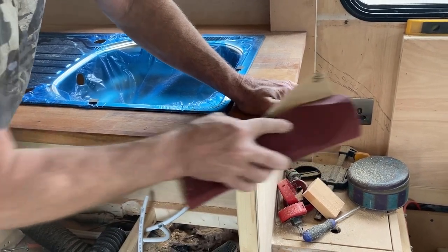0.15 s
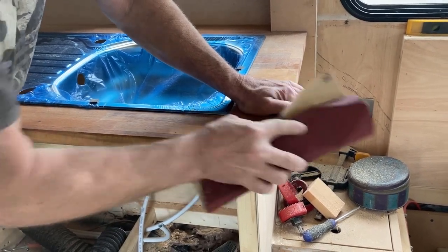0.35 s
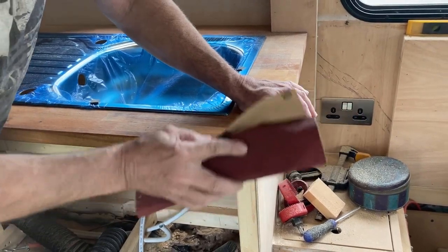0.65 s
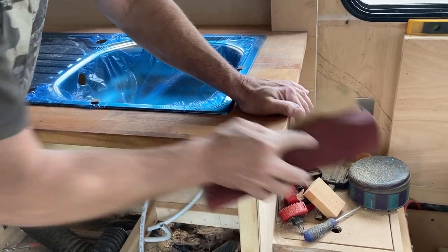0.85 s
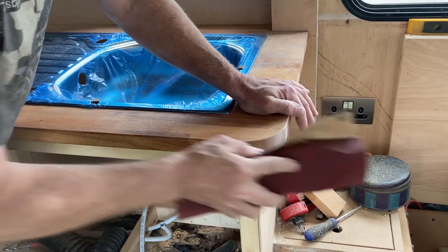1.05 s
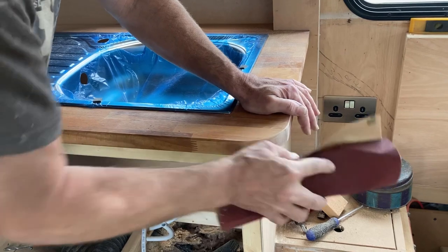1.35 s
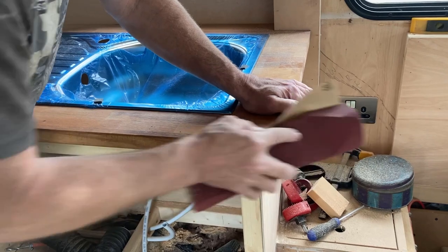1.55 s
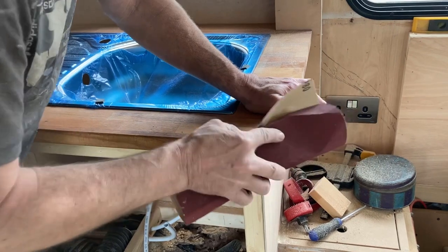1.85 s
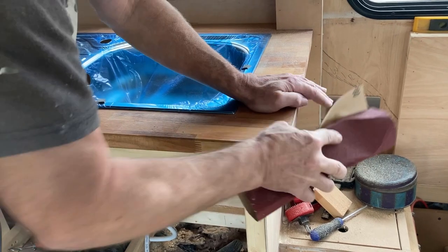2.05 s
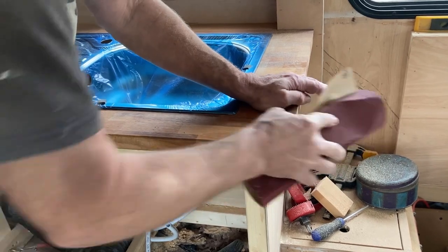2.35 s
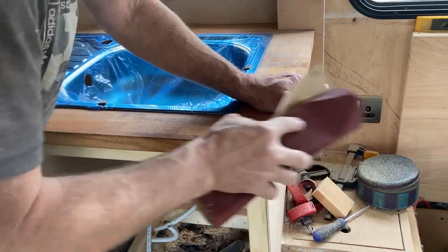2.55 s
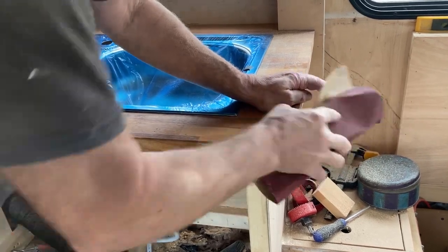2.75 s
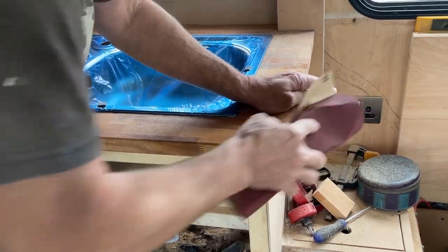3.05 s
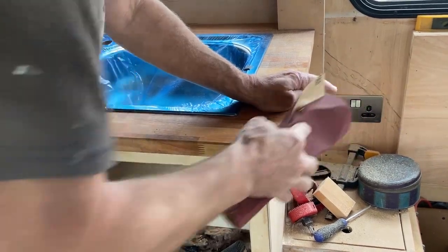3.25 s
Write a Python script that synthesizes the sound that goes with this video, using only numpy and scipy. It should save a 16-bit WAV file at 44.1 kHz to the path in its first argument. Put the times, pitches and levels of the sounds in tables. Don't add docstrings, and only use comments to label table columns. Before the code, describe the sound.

Sandpaper round a block rasps back and forth on a wooden worktop edge, pauses, then makes separate strokes, each starting with a woody knock and swelling in hiss; small panelled cabin, close stereo microphone.

```python
import sys
import numpy as np
from scipy import signal
from scipy.fft import rfft, irfft
from scipy.io import wavfile
from scipy.ndimage import uniform_filter1d

SR = 44100
rng = np.random.default_rng(int(sys.argv[2]) if len(sys.argv) > 2 else 0)


def volts_from_decibels(level):
    exponent = np.asarray(level, float) / 20
    return 10 ** exponent


def put_to_file(sound):
    columns = np.atleast_2d(sound).T
    safe = np.clip(columns, -1, 1)
    whole_steps = np.round(safe * 32767)
    wavfile.write(sys.argv[1], SR, whole_steps.astype(np.int16))


N = 149940
T = np.arange(N) / SR

# start_s, peak_db, favoured_pitch_hz, boom_db
KNOCKS = [
    (0.771, -20, 930, 9.5),
    (0.791, -31, 487, 11),
    (0.887, -22.5, 293, 10),
    (1.155, -33, 1030, -3),
    (1.513, -20.5, 560, 0.5),
    (1.87, -22.5, 444, -3),
    (2.217, -19.5, 810, 6),
    (2.626, -21, 410, 15),
    (2.648, -23.5, 293, 5),
    (2.973, -21.5, 460, 10.5),
]
# pitch_hz, level_db, t60_s (time to fade by 60 dB)
WORKTOP = [(155, -6, 0.04), (304, -3, 0.15), (380, 4, 0.015), (492, -4.5, 0.19), (650, 0, 0.02),
           (740, 4.5, 0.021), (885, -6.5, 0.097), (1020, 3.5, 0.011), (1159, -9, 0.091), (1326, -9, 0.094),
           (1760, -5, 0.021), (2480, -11, 0.041), (2666, 3, 0.0077), (3680, -21, 0.0067)]
# pitch_hz, level_db, t60_s
PANELS = [(38.6, -2, 0.68), (52.3, -4, 0.58), (74.8, -2, 0.14), (90, 1, 0.23), (112.2, -6, 0.29),
          (153.2, -5.5, 0.17), (200, -2.5, 0.11), (244, -30, 0.059), (293, -9, 0.15)]
# pitch_hz, level_db (per Hz)
GRIT = [(120, -19.5), (250, -11.5), (1000, -4.5), (1400, -4.5), (1700, -11.5), (2700, -7), (8000, -14),
        (12000, -18), (15500, -24.5)]


def rms_one(x):
    return x / np.sqrt(np.mean(x ** 2) + 1e-20)


def at_hz(points, hz):
    p = np.array(points)
    return np.interp(np.log(hz + 1), np.log(p[:, 0] + 1), p[:, 1])


def colour(x, points):
    gain = volts_from_decibels(at_hz(points, np.fft.rfftfreq(N, 1 / SR)))
    return irfft(rfft(x) * gain, N)


def band_noise(order, low_hz, high_hz):
    band = signal.butter(order, [low_hz, high_hz], "band", fs=SR, output="sos")
    return rms_one(signal.sosfilt(band, rng.standard_normal(N)))


def drift(rate_hz):
    r = np.exp(-2 * np.pi * rate_hz / SR)
    settle = 9000
    return rms_one(signal.lfilter([1], [1, -2 * r, r * r], rng.standard_normal(N + settle))[settle:])


def ring(clicks, hz, t60):
    r, w = volts_from_decibels(-60 / (t60 * SR)), 2 * np.pi * hz / SR
    return signal.lfilter([0, np.sin(w)], [1, -2 * r * np.cos(w), r * r], clicks + 1e-18)


def tail(x, t60):
    t = T[:SR // 2]
    echo = rng.standard_normal(len(t)) * volts_from_decibels(-60 * t / t60) * np.minimum(t / 0.0017, 1)
    return signal.fftconvolve(x, echo / np.linalg.norm(echo))[:N]


def quiet_cabin():
    # pitch_hz, level_db (per Hz)
    spectrum = [(15, -39), (25, 0), (52, 2.5), (141, -12.5), (1140, -30.5), (1400, -38), (3000, -40.5),
                (12000, -43.5), (15600, -82), (22000, -120)]
    return volts_from_decibels(-69) * rms_one(colour(rng.standard_normal(N), spectrum))


def echoes(x):
    low = signal.sosfilt(signal.butter(1, 2500, fs=SR, output="sos"), x)
    high = signal.lfilter(*signal.butter(1, 11000, fs=SR), x - low)
    return tail(low, 0.25) + tail(high, 0.23)


def springs():
    # start_s, level_db, favoured_pitch_hz, shove_length_s
    events = [(.05, -46.5, 55, 0.04), (0.298, -49, 90, 0.045), (0.425, -40.5, 200, 0.021),
              (.526, -57.5, 140, 0.0065), (0.9, -30, 155, 0.036), (0.86, -40.5, 90, 0.15),
              (.975, -40.5, 155, 0.027), (1.293, -40.5, 167.8, 0.018), (1.545, -42, 60, 0.039),
              (1.656, -35.5, 292, 0.038), (1.72, -44.5, 150, 0.019), (1.74, -47.5, 65, 0.016),
              (1.912, -37, 69.6, 0.046), (2.035, -35.5, 90, 0.044), (2.28, -39.5, 60, 0.055),
              (2.41, -41.5, 164, 0.042), (2.507, -48.5, 215, .008), (2.54, -52, 69.44, 0.038),
              (2.72, -41, 52, 0.039), (2.819, -48.5, 150, 0.044), (3.059, -40.5, 75.6, 0.041),
              (3.24, -41, 59.6, 0.025), (3.277, -41, 85.5, 0.015)]
    noise, shoves = rng.standard_normal(N), []
    soften = signal.butter(2, 500, fs=SR)
    for s, _, _, length in events:
        fade = (T > s) * np.exp(-np.abs(T - s) / length)
        shove = 0.81 * noise * fade / np.sqrt(length * SR)
        shove[int(s * SR)] += 0.7
        shoves.append(signal.lfilter(*soften, shove))
    out = np.zeros(N)
    for hz, _, t60 in PANELS:
        push = np.zeros(N)
        for shove, (_, db, near_hz, _) in zip(shoves, events):
            push += volts_from_decibels(db - 19 * np.log2(hz / near_hz) ** 2) * shove
        out += ring(push, hz, t60)
    return out


def grains():
    per_s, spread_db, flutter_db = 7000, 1.5, 2
    size = volts_from_decibels(spread_db * np.minimum(rng.exponential(1, N), 4)) * rng.choice([-1, 1], N)
    clicks = size * (rng.random(N) < per_s / SR)
    return rms_one(clicks) * volts_from_decibels(flutter_db * drift(32.5))


def brushing():
    # start_s, length_s, level_db
    brushes = [
        (0.726, 0.066, -69),
        (0.98, 0.16, -76.5),
        (1.094, 0.12, -76.5),
        (1.355, 0.092, -75.5),
        (1.766, 0.073, -79),
        (2.111, 0.18, -67.5),
        (2.466, 0.26, -70),
        (2.87, 0.15, -74.5),
    ]
    # start_s, level_db, decay_s
    ticks = [
        (1.107, -65.5, 0.0069),
        (.585, -84.5, 0.003),
        (2.506, -64, 0.0076),
        (2.545, -73, 0.0046),
        (1.46, -79, 0.011),
    ]
    # pitch_hz, width_hz, level_db
    sheet = [(940, 440, 18.5), (2450, 200, 6), (3360, 900, -12), (4370, 330, -16), (6600, 87, -3.5)]
    noise = grains() * volts_from_decibels(1.5 * drift(25))
    body = rms_one(sum(volts_from_decibels(db) * rms_one(ring(noise, hz, 1.6 / max(width, 100)))
                       for hz, width, db in sheet))
    rustle = rms_one(signal.lfilter(*signal.butter(2, 5900, fs=SR), colour(noise, GRIT)))
    level = np.zeros(N)
    for s, length, db in brushes:
        level += volts_from_decibels(db) * np.clip(np.minimum(T - s, s + length - T) / 0.0074, 0, 1)
    for s, db, decay in ticks:
        level += volts_from_decibels(db) * (T > s) * np.exp(-np.abs(T - s) / decay)
    return (0.83 * body + rustle) * level


def cushion():
    shape = sum(volts_from_decibels(db - 30) * np.exp(-np.abs(T - s) / 0.0058) for s, db, _, _ in KNOCKS)
    return shape * band_noise(2, 250, 900)


def cracks():
    shape = np.zeros(N)
    for s, db, _, _ in KNOCKS:
        away_s = np.abs(T - s)
        first_touch = volts_from_decibels(-44.5) * np.exp(-away_s / 0.0064)
        slap = volts_from_decibels(-25.5) * np.exp(-away_s / 0.0063)
        shape += volts_from_decibels(db) * np.where(T > s, slap, first_touch)
    return shape * band_noise(1, 700, 4500)


def bounces():
    # start_s, level_db, pitch_hz, t60_s
    events = [(.773, -28, 500, 0.046), (.774, -23.5, 994, 0.049), (.779, -28, 703, 0.069),
              (.789, -25, 542, 0.051), (0.804, -28, 193, 0.035), (.777, -30, 348, 0.056),
              (.819, -36.5, 464, 0.069), (.888, -22, 706, 0.023), (.888, -19.5, 336, 0.012),
              (.902, -28, 282.6, 0.12), (.911, -30, 200, 0.076), (1.156, -33, 1076, 0.048),
              (1.159, -36.5, 570, 0.03), (1.164, -35, 256, 0.061), (1.172, -35, 395, .04),
              (1.193, -39, 303, 0.046), (1.515, -22, 573, 0.029), (1.516, -35, 304, .05),
              (1.516, -35, 1780, 0.016), (1.517, -33.5, 1356, 0.049), (1.523, -32.5, 440, 0.033),
              (1.523, -29, 912, 0.05), (1.53, -27, 535, 0.05), (1.562, -33, 477, 0.045),
              (1.872, -29, 1007, 0.043), (1.873, -27, 400, 0.043), (1.88, -29.5, 776, 0.043),
              (1.889, -31, 535, 0.056), (2.217, -35, 2730, 0.029), (2.219, -15.5, 874, 0.035),
              (2.219, -23, 547, 0.043), (2.226, -20, 690, 0.034), (2.234, -20.5, 592, 0.038),
              (2.24, -23.5, 295.4, 0.065), (2.253, -31, 760, .04), (2.628, -23, 485, 0.024),
              (2.628, -24, 849, 0.027), (2.637, -16.5, 506, 0.016), (2.644, -27.5, 422, 0.05),
              (2.65, -18.5, 299.7, 0.072), (2.659, -24, 194, 0.064), (2.673, -28.5, 466, 0.062),
              (2.977, -23.5, 867, 0.031), (2.977, -19.5, 403, 0.048), (2.978, -25.5, 1091, 0.048),
              (2.991, -29, 683, .04), (2.995, -27, 366, 0.042)]
    out, t = np.zeros(N + SR), T[:SR // 4]
    swell = 1 - np.exp(-t / 0.00092)
    for s, db, hz, t60 in events:
        out[int(s * SR):][:len(t)] -= volts_from_decibels(db - 60 * t / t60) * swell * np.sin(2 * np.pi * hz * t)
    return out[:N]


def knocks():
    worktop_db, panels_db, sink_octaves_per_s = -3, -23.5, 93
    out, span = np.zeros(N + SR), SR // 2
    lag_s = np.array([0, .0025, .007, .012, .019, .028])
    strength = [0.15, -0.53, 0.36, 0.33, 0.32, 0.44]
    soften = signal.butter(2, 2200, fs=SR)
    for s, db, near_hz, boom_db in KNOCKS:
        i = int(s * SR)
        for modes, into_db, favour_db in ((WORKTOP, worktop_db, 1), (PANELS[1:6], panels_db + boom_db, 0)):
            for k, (hz, g, t60) in enumerate(modes):
                octaves = np.log2(hz / near_hz) + sink_octaves_per_s * lag_s
                sign = np.r_[1, 1, rng.choice([-1, 1], 4)]
                uneven_db = rng.normal(0, 1.25, 6) - favour_db * octaves ** 2
                touch = np.zeros(span)
                touch[(lag_s * SR).astype(int)] = strength * sign * volts_from_decibels(uneven_db)
                push = signal.lfilter(*soften, touch)
                rung = ring(push, hz * rng.normal(1, 0.055), 0.72 * t60)
                out[i:i + span] += volts_from_decibels(db + into_db + g) * (-1) ** k * rung
    return out[:N]


def effort_db():
    # time_s, level_db
    passes = [
        [(0.0, -53.5), (0.016, -61.5), (0.048, -49), (0.12, -48.5), (0.145, -66)],
        [(0.145, -72), (0.153, -50), (0.161, -50), (0.235, -49), (0.27, -68)],
        [(0.27, -56), (0.282, -56), (0.31, -51), (0.36, -48.5), (0.38, -42), (0.392, -42.5), (0.408, -48.5),
         (0.418, -37.5), (0.45, -65.5)],
        [(2.975, -50), (3.007, -57), (3.037, -45.5), (3.141, -46.5), (3.171, -59), (3.18, -85)],
        [(3.18, -61), (3.188, -52), (3.193, -49.5), (3.274, -45.5), (3.325, -60)],
        [(3.325, -68), (3.345, -51), (3.377, -44), (3.4, -49)],
    ]
    # time_s, level_db
    strokes = [
        [(0.775, -48), (0.791, -55), (0.841, -46), (0.862, -42), (0.881, -35.5), (0.895, -38.5), (0.92, -53)],
        [(1.157, -52.5), (1.219, -50.5), (1.243, -46.5), (1.252, -39.5), (1.27, -38.5), (1.29, -39.5),
         (1.31, -53.5)],
        [(1.514, -54.5), (1.566, -53.5), (1.62, -35.5), (1.664, -33.5), (1.69, -53.5)],
        [(1.871, -54), (1.905, -54.5), (1.931, -44), (1.94, -42), (1.985, -37), (1.996, -35), (2.015, -36.5),
         (2.04, -53)],
        [(2.218, -45), (2.254, -61), (2.28, -49), (2.31, -51), (2.384, -39), (2.396, -46), (2.41, -52)],
        [(2.628, -53.5), (2.68, -47), (2.745, -45.5), (2.762, -38), (2.78, -44), (2.8, -46)],
    ]
    silent_db, lift_db_per_s, landing_s = -140., 847, 0.0061
    out = np.full(N, silent_db)
    for rows in [*passes, *strokes]:
        s, db = np.transpose(rows)
        level = np.interp(T, s, db) - lift_db_per_s * np.maximum(T - s[-1], 0)
        out = np.maximum(out, np.where(T >= s[0], level, silent_db))
    return uniform_filter1d(out, max(int(landing_s * SR), 1))


def sanding():
    bright, patchy_db = 0.16, 0.5
    db, grit = effort_db(), grains()
    hiss = colour(grit, GRIT)
    hiss /= np.std(signal.sosfilt(signal.butter(4, [2000, 8000], "band", fs=SR, output="sos"), hiss))
    out, rest = np.zeros(N), hiss
    for k, hz in enumerate([800, 1600, 3200, 6400]):
        low = signal.sosfilt(signal.butter(1, hz, fs=SR, output="sos"), rest)
        brighten_db = bright * (k - 2) / 2 * (db + 24.5)
        out += low * volts_from_decibels(db + patchy_db * drift(8.7) + brighten_db)
        rest = rest - low
    out += rest * volts_from_decibels(db + bright * (db + 62))
    rub = volts_from_decibels(db) * grit
    for modes, into_db in ((WORKTOP, -10), (PANELS, -6.5)):
        unit = np.sqrt(sum(volts_from_decibels(2 * g) * t60 * SR / (4 * np.log(1000)) for hz, g, t60 in modes))
        out += volts_from_decibels(into_db) / unit * sum(volts_from_decibels(g) * ring(rub, hz, t60) for hz, g, t60 in modes)
    return out


def ports(x, elsewhere):
    # pitch_hz, level_db
    unlike = [(30, -16), (330, -14), (520, -6.5), (1000, -2.5), (3000, 0), (5500, -6), (7500, -11),
              (16000, -34.5)]
    comb_hz, comb_from_hz, left_db = 4580, 4900, 3
    hz = np.fft.rfftfreq(N, 1 / SR)
    lead = (3 * np.pi - 2 * np.pi * hz / comb_hz) / (1 + (comb_from_hz / (hz + 1)) ** 12)
    tilt = volts_from_decibels(left_db / 2 * np.exp(-np.log((hz + 1) / 1200) ** 2 / 2))
    pair = np.array([np.exp(.5j * lead) * tilt, np.exp(-.5j * lead) / tilt])
    return irfft(rfft(x) * pair, N) + colour(elsewhere, unlike) * [[1], [-1]]


def scene():
    echo = volts_from_decibels(-7)
    hits = springs() + brushing() + cushion() + cracks() + bounces() + knocks()
    near = sanding() + hits
    aside = sanding() + tail(hits, 0.1)
    middle = near + echo * echoes(near) + quiet_cabin()
    side = aside + echo * echoes(aside) + quiet_cabin()
    return ports(middle, side)


def band_limit(x):
    return signal.sosfilt(signal.butter(12, 15920, fs=SR, output="sos"), x)


def record(dry):
    no_rumble = signal.sosfilt(signal.butter(4, 40, "high", fs=SR, output="sos"), dry)
    mix = signal.sosfilt(signal.cheby2(14, 70, 16300, fs=SR, output="sos"), no_rumble)
    return band_limit(mix)


dry = scene()
out = record(dry)
put_to_file(out)
```